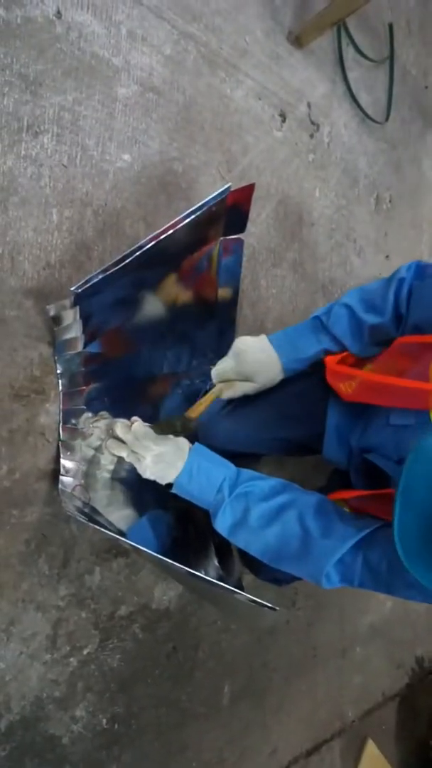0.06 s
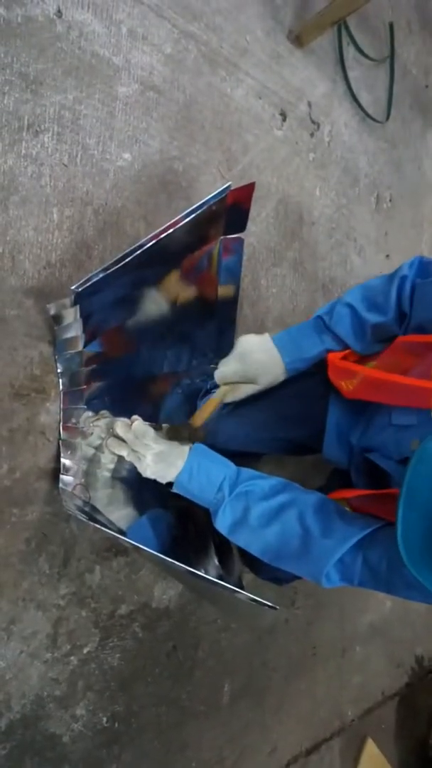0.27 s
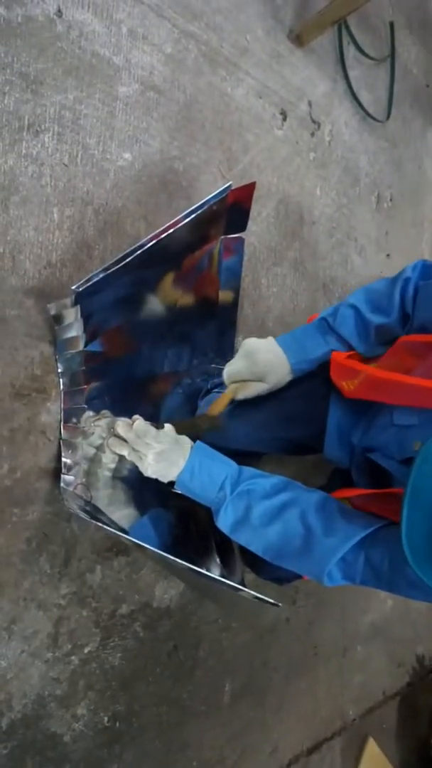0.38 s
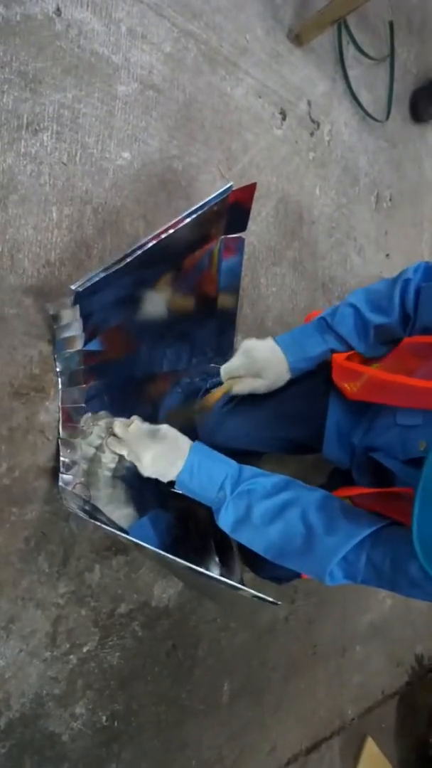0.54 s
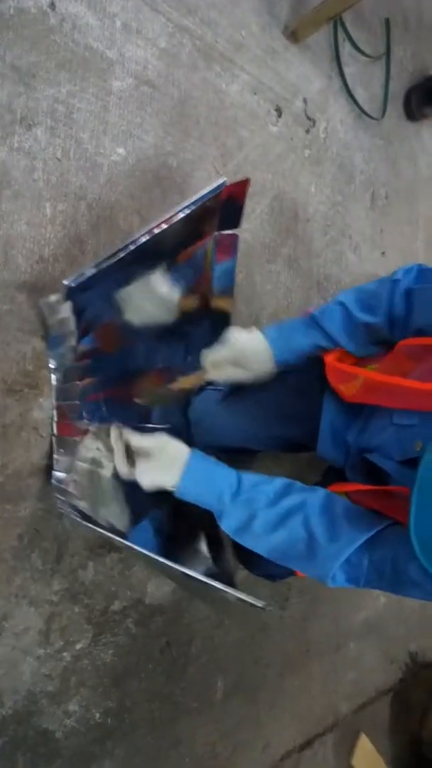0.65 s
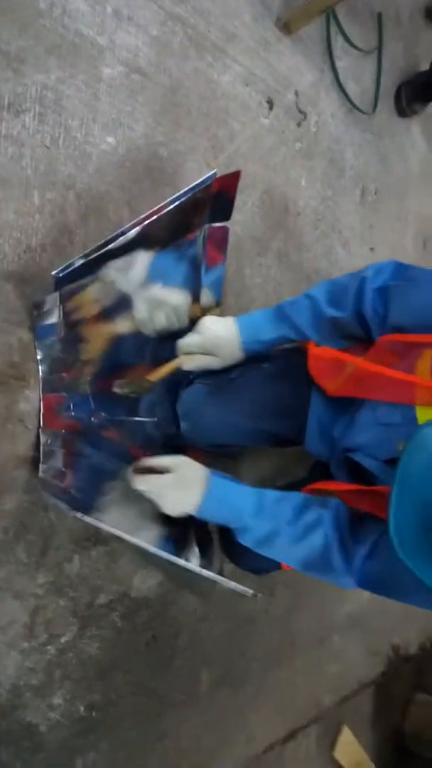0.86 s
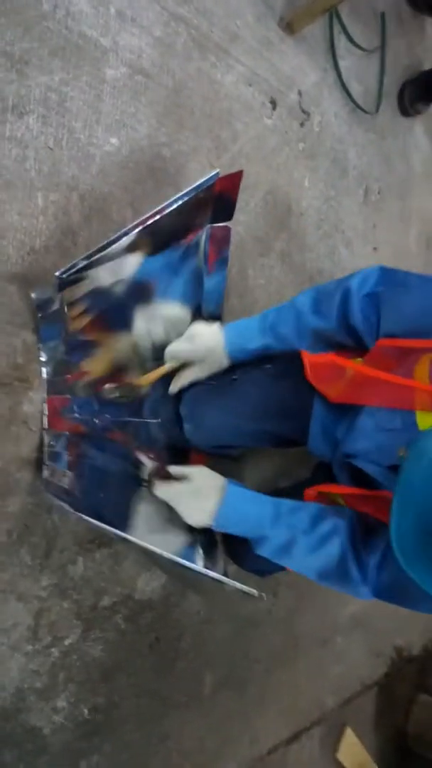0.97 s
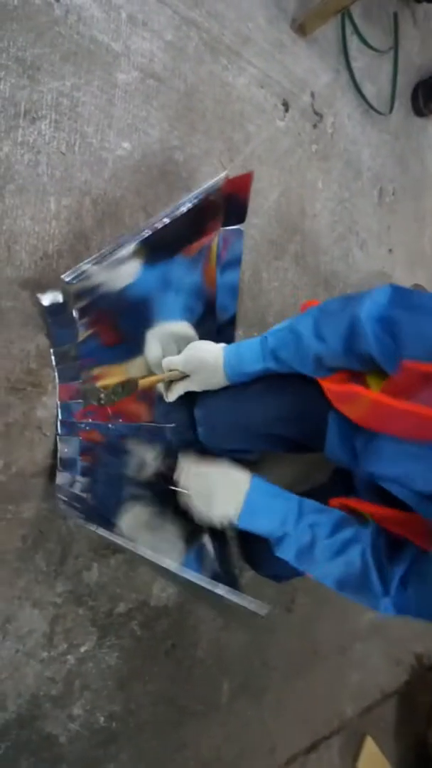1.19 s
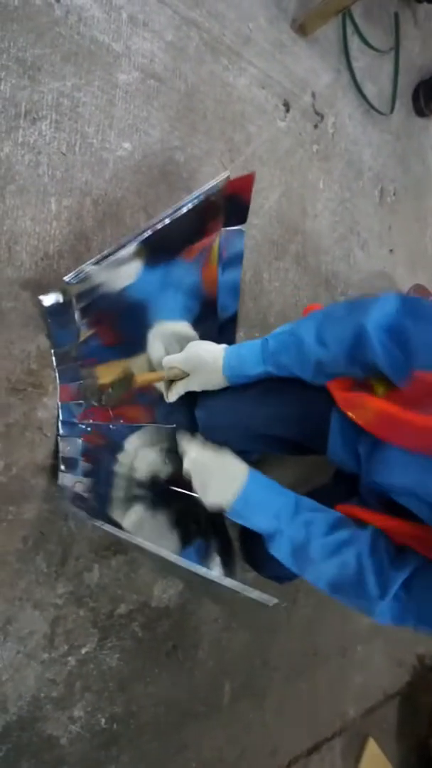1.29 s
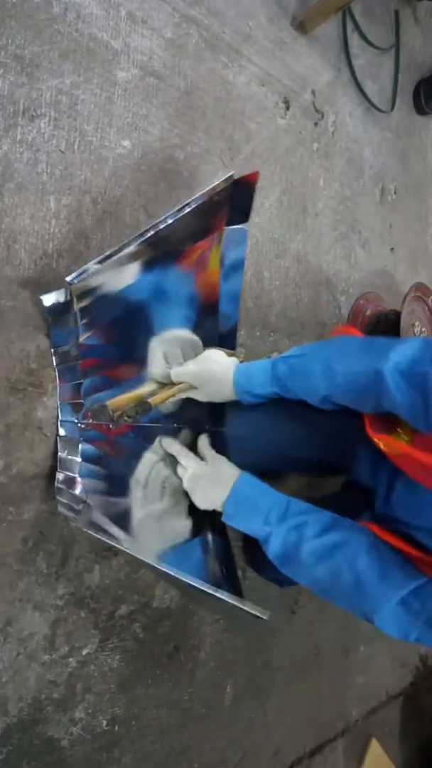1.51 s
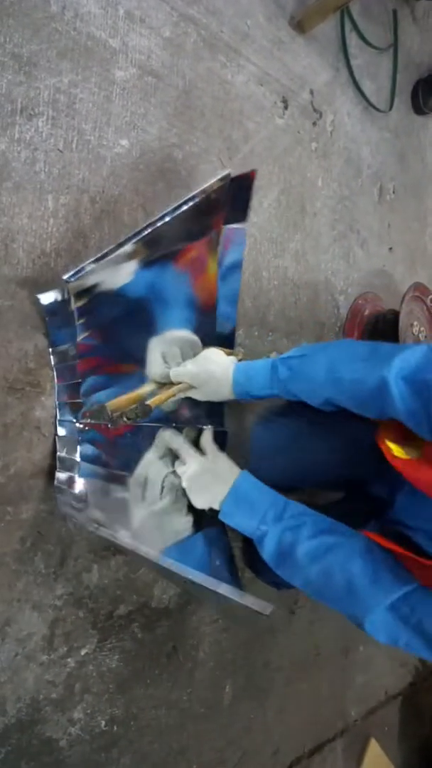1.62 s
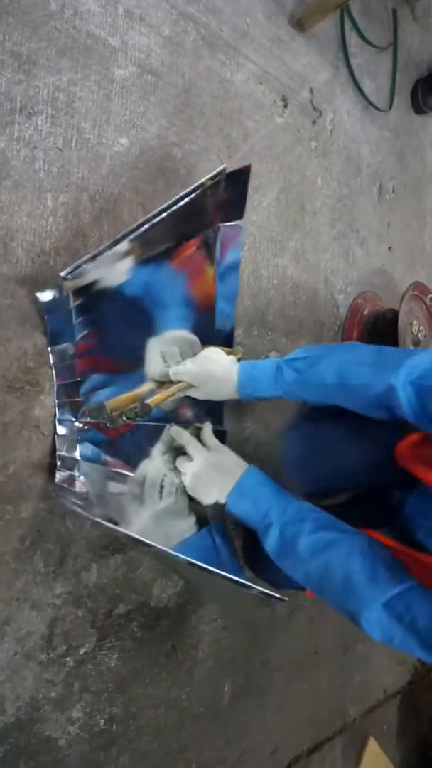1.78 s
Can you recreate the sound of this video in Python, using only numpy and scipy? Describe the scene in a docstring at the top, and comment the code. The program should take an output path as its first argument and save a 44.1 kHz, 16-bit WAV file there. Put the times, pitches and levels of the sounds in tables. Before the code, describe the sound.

Hammer strikes sheet metal three times, then the sheet buckles, clangs and scrapes.

```python
"""A hammer beats the folded edge of a large steel sheet three times, overloading a close microphone
in a hard-walled workshop. Each blow cracks, thumps and sets the sheet's modes ringing.
The sheet is then shifted: it slides, buckles with a hollow wobble, clangs twice, knocks lightly
and scrapes as it settles. A noise suppressor shortens the tails; gain control ducks the hardest hits."""
import sys
import numpy as np
from scipy import signal
from scipy.fft import rfft, irfft, next_fast_len
from scipy.io import wavfile
from scipy.ndimage import uniform_filter1d

SR = 44100
rng = np.random.default_rng(int(sys.argv[2]) if len(sys.argv) > 2 else 0)


def master(y):
    """Save y as 16-bit WAV."""
    cut = np.clip(np.atleast_2d(y).T, -1, 1)
    pcm = np.round(cut * 32767)  # scale
    wavfile.write(sys.argv[1], SR, pcm.astype(np.int16))


N = 81585
TIME = np.arange(N) / SR


def amp(db):
    """Decibels to gain."""
    return 10 ** (np.asarray(db) / 20)

def unit(x):
    """Scales to rms 1."""
    return x / np.sqrt(np.mean(x ** 2) + 1e-20)

def read(points, hz):
    """Reads a table on a log-frequency axis."""
    point_hz, value = np.transpose(points)
    return np.interp(np.log(hz + 1), np.log(point_hz), value)

def add(mix, start_s, sound):
    """Mixes a sound in at its start time."""
    part = mix[round(start_s * SR):][:len(sound)]
    part += sound[:len(part)]

def coloured(x, spectrum, tilt_db=0):
    """Gives x a spectrum, tilted per octave about 3 kHz; rms 1."""
    size = next_fast_len(N)
    hz = np.fft.rfftfreq(size, 1 / SR)
    octaves = np.log2(np.maximum(hz, 500) / 3000)
    gain = amp(read(spectrum, hz) + tilt_db * octaves)
    return unit(irfft(rfft(x, size) * gain, size)[:N])

def noise(spectrum, tilt_db=0):
    """Steady noise with a spectrum."""
    return coloured(rng.standard_normal(N), spectrum, tilt_db)

def resonant(x, bands):
    """Passes x through narrow resonances; rms 1."""
    out = np.zeros(N)
    for hz, width, db in bands:
        bandpass = signal.butter(2, [hz - width / 2, hz + width / 2], "band", fs=SR)
        out += amp(db) * signal.lfilter(*bandpass, x)
    return unit(out)

def struck(rise_s, t60):
    """Quick rise and a decay of 60 dB in t60 seconds."""
    return np.minimum(TIME / rise_s, 1) * amp(-60 * TIME / t60)

def impulses(per_s):
    """Randomly timed clicks of either sign."""
    return rng.choice([-1., 1.], N) * (rng.random(N) < per_s / SR)

def slips(spread_db=3):
    """A dense train of tiny slips of uneven size."""
    size = amp(spread_db * np.minimum(rng.exponential(1, N), 3))
    return size * impulses(per_s=3700)

# The workshop's hard walls. Each row: frequency in Hz, seconds to fall 60 dB.
WALL_T60 = [(100, 1.4), (500, 0.7266), (1400, 0.56), (3000, 0.5578), (6000, 0.415), (10000, 0.36),
            (15000, 0.37)]
# Their colour. Each row, as in every spectrum below: frequency in Hz, relative spectral level in dB.
WALL_SPECTRUM = [(60, -18), (250, -2), (600, 5), (2000, 0.5), (5000, -0.5), (8000, -5.5), (15000, -5)]
def in_room(x, send_db=0):
    """Adds the workshop's tail: dense reflections that build up, each band dying at its own speed."""
    reflections = coloured(impulses(per_s=4000), WALL_SPECTRUM)
    hz, t, bands = signal.stft(reflections, SR, nperseg=256)
    decay = amp(-60 * t / read(WALL_T60, hz)[:, None])
    tail = signal.istft(bands * decay, SR, nperseg=256)[1][:N]
    tail *= np.minimum(TIME / 0.021, 1)
    return x + amp(send_db - 2.5) * signal.fftconvolve(x, tail / np.linalg.norm(tail))[:N]

# Room tone. Each row: frequency in Hz, level in dB.
AIR_SPECTRUM = [(25, -23.5), (100, -7), (300, 1.5), (1000, -0.5), (1500, -4), (2500, -5.5), (3500, -5.5),
                (4900, -5), (6500, -14.5), (8500, -27), (15000, -39)]
def workshop_air():
    """Quiet air lies under everything from the start."""
    return amp(-50) * noise(AIR_SPECTRUM)

# Hammer on steel, close up. Each row: frequency in Hz, level in dB.
CRACK_SPECTRUM = [(40, -41.5), (150, -32.5), (450, -28.5), (800, -12.5), (1700, -3.5), (3300, 0),
                  (5000, 0.5), (7400, -7), (8600, -16.5), (11000, -32), (15500, -38)]
def contact_crack(rise_s, tilt_db):
    """Hard contact gives a short, bright burst."""
    return amp(1) * noise(CRACK_SPECTRUM, tilt_db) * struck(rise_s, t60=0.076)

# The fold's resonances. Each row: frequency in Hz, width in Hz, level in dB.
FOLD_BANDS = [(1763, 360, -7), (2380, 62, 6.5), (2620, 180, 8), (3100, 55, -3.5), (3300, 73, 0.5),
              (3640, 55, 8), (4515, 100, -0.5), (4810, 200, -6), (5667, 240, -14.5), (6790, 78, -11.5),
              (7280, 110, -3), (7680, 95, -7)]
def fold_bark(rise_s):
    """The folded edge barks briefly when hit."""
    return amp(-5.5) * resonant(rng.standard_normal(N), FOLD_BANDS) * struck(rise_s, t60=0.29)

# The whole sheet's clang. Each row: frequency in Hz, level in dB.
CLANG_SPECTRUM = [(40, -42), (120, -31), (300, -19.5), (520, -17), (850, -6), (1200, -6), (1800, 3),
                  (2800, -0.5), (4600, -1), (6000, -2), (7500, -5), (8400, -21.5), (11000, -24.5),
                  (15500, -34.5)]
def sheet_clang(mode_bins, rise_s, tilt_db):
    """The same crowd of modes sounds at every hit, with new phases."""
    phases = np.exp(2j * np.pi * rng.random(len(mode_bins)))
    crowd = irfft(mode_bins * phases, N)
    return amp(-8) * coloured(crowd, CLANG_SPECTRUM, tilt_db) * struck(rise_s, t60=0.26)

# The thump's colour. Each row: frequency in Hz, level in dB.
THUMP_SPECTRUM = [(20, -18.5), (50, -9.5), (120, -3.5), (270, -7), (420, -2), (900, -24.5)]
def low_thump(rise_s):
    """A short, dull low thump comes with each hit."""
    return amp(-19) * noise(THUMP_SPECTRUM) * struck(rise_s, t60=0.027)

# The sheet's strongest modes. Each row: frequency in Hz, level in dB, seconds to fall 60 dB.
SHEET_MODES = [(777, 8, 0.23), (1750, -5, 1), (1799, -17, 1), (2010, -28, .5), (2265, -16, 1),
               (2350, -8, 1), (2820, -6, .5), (2770, -7.5, 1), (2870, 14, 0.23), (3200, 6, 0.43),
               (3296, 2.5, 0.27), (4020, -3, 0.33), (4490, 16.5, 0.22), (7200, -9, 0.28), (9200, -24, 0.74),
               (11900, -28.5, .65)]
def sheet_ring(rise_s):
    """A few modes stand out as clear, dying tones."""
    return sum(amp(db - 27) * struck(rise_s, t60) * np.sin(2 * np.pi * (hz * TIME + rng.random()))
               for hz, db, t60 in SHEET_MODES)

# The rim's resonances. Each row: frequency in Hz, width in Hz, level in dB.
RIM_BANDS = [(545, 156, -6.5), (3350, 120, 2.5), (5348, 76, -1.5), (6660, 310, -18.5)]
def rim_song(rise_s):
    """The rim sings on longest after each hit."""
    return amp(-26.5) * resonant(rng.standard_normal(N), RIM_BANDS) * struck(rise_s, t60=1.27)

# Hits close to the microphone. Each row: start in seconds, level in dB, trims of crack, clang and thump
# in dB, treble tilt in dB per octave, trim of ring and fold in dB, rise in seconds.
HITS = [(.2130, 0, -2, -0.5, -8, -0.5, -3, 0.00076), (0.4292, -1.5, 3.5, 3, 3.5, 0.24, -1.5, 0.0016),
        (.6143, 0, 1, 0.5, 6, 0.24, -4.5, 0.00079), (1.2150, 1.5, -5, -4, -5, 0.54, -11, 0.0083),
        (1.2692, -5.5, -5, -1.5, -38, -0.04, -18, 0.0029)]
def sheet_hits(mode_count=900):
    """Three hammer blows, then two clangs of the shifted sheet, each a new mix of the layers above."""
    out = np.zeros(N)
    bins = N // 2 + 1
    mode_bins = rng.random(bins) < 2 * mode_count / bins
    for start, level_db, crack_db, clang_db, thump_db, tilt_db, ring_db, rise_s in HITS:
        crack = amp(crack_db) * contact_crack(rise_s, tilt_db)
        fold = amp(ring_db) * fold_bark(rise_s)
        clang = amp(clang_db) * sheet_clang(mode_bins, rise_s, tilt_db)
        thump = amp(thump_db) * low_thump(rise_s)
        ring = amp(ring_db) * sheet_ring(rise_s) + rim_song(rise_s)
        contact = in_room(crack + fold, send_db=-1.5) + in_room(thump, send_db=-8)
        add(out, start, amp(level_db) * (contact + in_room(clang, send_db=1) + ring))
    return out

# Faint slides of the edge. Each row: start in seconds, length in seconds, level in dB.
SLIDES = [(.93, 0.057, -44), (1.654, 0.089, -37), (1.755, .09, -67)]
# The rubbed edge's resonances. Each row: frequency in Hz, width in Hz, level in dB.
EDGE_BANDS = [(2450, 400, 1), (2750, 240, 2.5), (3200, 420, 2), (3620, 630, -4), (5250, 330, -4.5),
              (6630, 350, -10), (7500, 760, -22), (11000, 4000, -37)]
def edge_scrapes(ramp_s=0.013, fade_db=-1.5):
    """The edge slides, its slips ringing a few narrow resonances."""
    pressure = np.zeros(N)
    for start, length, level_db in SLIDES:
        t = np.arange(0, length, 1 / SR)
        ramps = np.clip(np.minimum(t, length - t) / ramp_s, 0, 1)
        add(pressure, start, ramps * amp(level_db + fade_db * t / length))
    return in_room(pressure * resonant(slips(), EDGE_BANDS), send_db=-3)

# The swell of the crackle. Each row: time in seconds, level in dB.
CREASE_SWELL = [(1.108, -66), (1.116, -40), (1.130, -36.5), (1.135, -29.5), (1.17, -28), (1.21, -32.5),
                (1.24, -40)]
# Its colour. Each row: frequency in Hz, level in dB.
CREASE_SPECTRUM = [(100, -28), (300, -5.5), (650, -1.5), (1100, 0), (1700, 3.5), (2600, -0.5), (3000, -9.5),
                   (4100, -9), (4800, -21), (6600, -17.5), (8500, -36), (15000, -63)]
def crease_crackle():
    """Creases crackle as the sheet bends."""
    swell_db = np.interp(TIME, *np.transpose(CREASE_SWELL), left=-120, right=-120)
    return in_room(coloured(slips(), CREASE_SPECTRUM) * amp(swell_db))

# The sheet giving way. Each row: start in seconds, level in dB, pitch in Hz.
BUCKLE_POPS = [(1.112, -25.5, 902), (1.126, -22.5, 844), (1.134, -21.5, 718), (1.144, -18, 763)]
def buckling():
    """The panel pops through in a few hollow wobbles."""
    pops = np.zeros(N)
    for start, level_db, hz in BUCKLE_POPS:
        tone = np.sin(2 * np.pi * hz * TIME)
        add(pops, start, amp(level_db) * tone * struck(rise_s=0.0015, t60=0.087))
    return in_room(pops, send_db=-6)

# The edge touching down. Each row: start in seconds, level in dB.
KNOCKS = [(1.537, -22), (1.560, -32)]
# A knock's colour. Each row: frequency in Hz, level in dB.
KNOCK_SPECTRUM = [(60, -52), (400, -16), (1000, -27), (1300, -8.5), (2200, -3), (3300, 2.5), (4200, -7),
                  (5400, -6), (7300, -10.5), (8800, -34), (15000, -49)]
def edge_knocks():
    """The edge knocks lightly as the sheet settles."""
    knocks = np.zeros(N)
    for start, level_db in KNOCKS:
        add(knocks, start, amp(level_db) * noise(KNOCK_SPECTRUM) * struck(rise_s=0.0042, t60=0.093))
    return in_room(knocks, send_db=-1)

def noise_suppressor(x, cut_db=5.5, shut_db=8, open_db=15):
    """Turns down each band as it nears its own floor, shortening the tails."""
    bands = signal.stft(x, nperseg=512, noverlap=384)[2]
    power = (abs(bands) ** 2).mean(0)
    power = uniform_filter1d(uniform_filter1d(power, size=5, axis=0), size=5, axis=1)
    level_db = 10 * np.log10(abs(power) + 1e-16)
    floor_db = uniform_filter1d(np.percentile(level_db, 7, axis=1), size=7)
    shut = np.clip((open_db - level_db + floor_db[:, None]) / (open_db - shut_db), 0, 1)
    return signal.istft(bands * amp(-cut_db * shut), nperseg=512, noverlap=384)[1][:, :N]

def gain_control(x, threshold_db=-7.5, react_s=0.016, recover_db_per_s=55.5):
    """The gain dips just after the hardest cracks and recovers steadily."""
    pole = np.exp(-1 / (react_s * SR))
    smoother = [1 - pole], [1, -pole]
    power = signal.lfilter(*smoother, (x ** 2).mean(0))
    excess_db = np.maximum(10 * np.log10(power + 1e-12) - threshold_db, 0)
    recovery = recover_db_per_s * TIME
    held_db = np.maximum.accumulate(excess_db + recovery) - recovery
    return x * amp(-signal.lfilter(*smoother, held_db))

def scene():
    """One microphone close to the sheet feeds both channels alike."""
    sheet = sheet_hits() + edge_scrapes() + crease_crackle() + buckling() + edge_knocks()
    mono = sheet + workshop_air()
    return np.array([mono, mono])

def record(dry):
    """Noise suppression, gain control, clipping at full scale, then a 15.6 kHz band limit."""
    clipped = np.clip(gain_control(noise_suppressor(dry)), -1, 1)
    lowpass = signal.firwin(255, 15600, window=("kaiser", 8), fs=SR)
    return signal.oaconvolve(clipped, lowpass[None], "same")


dry = scene()
out = record(dry)
master(out)
```